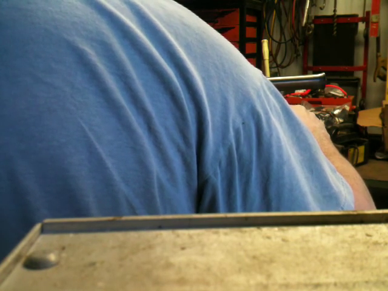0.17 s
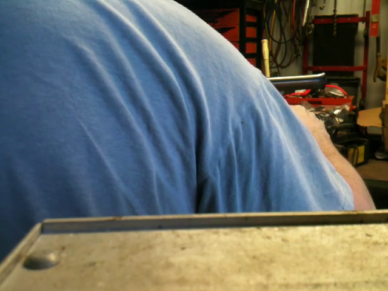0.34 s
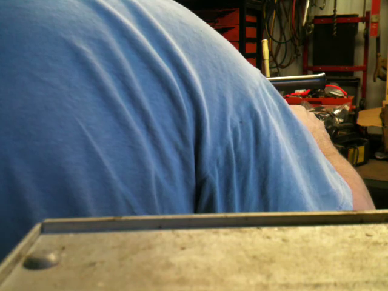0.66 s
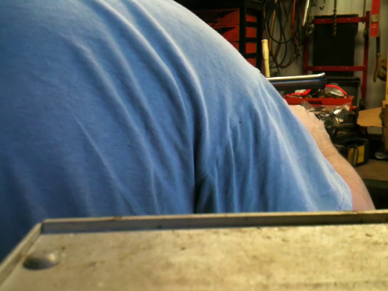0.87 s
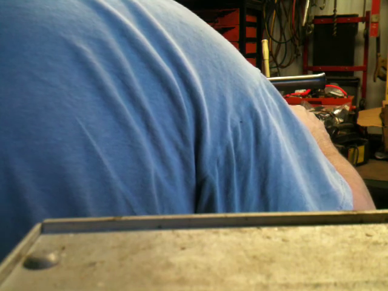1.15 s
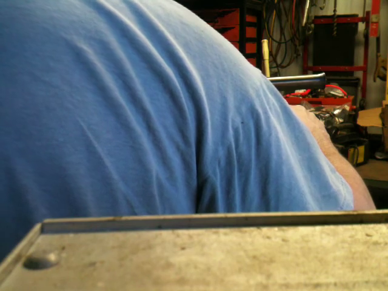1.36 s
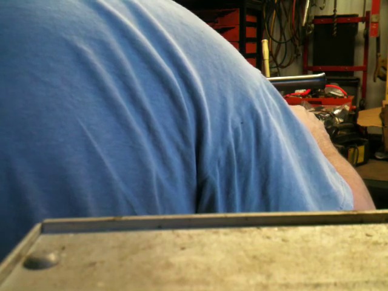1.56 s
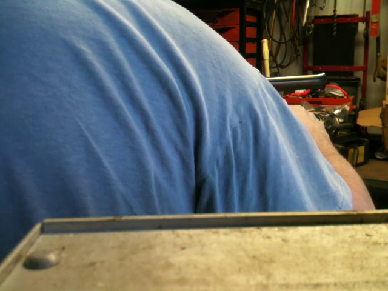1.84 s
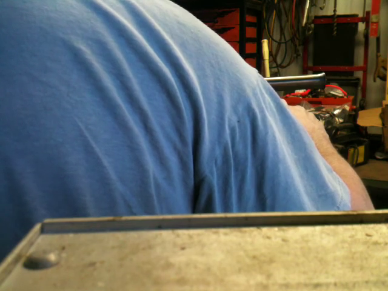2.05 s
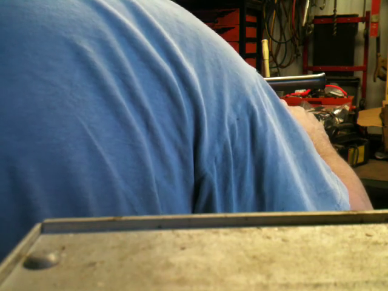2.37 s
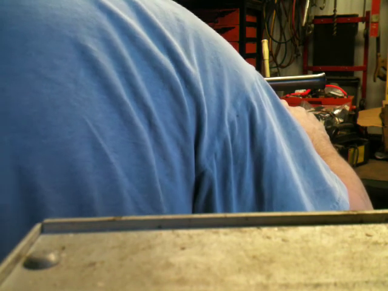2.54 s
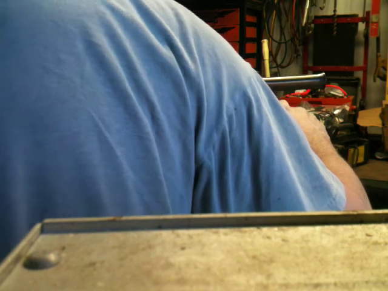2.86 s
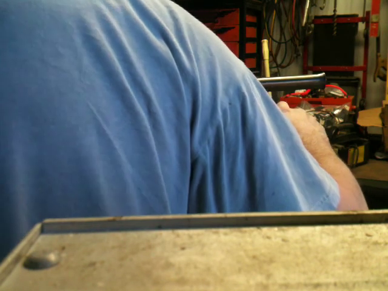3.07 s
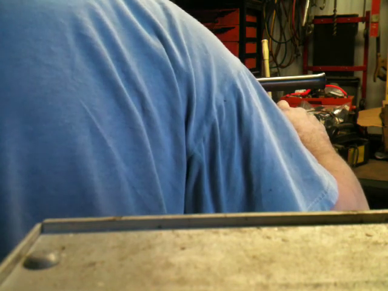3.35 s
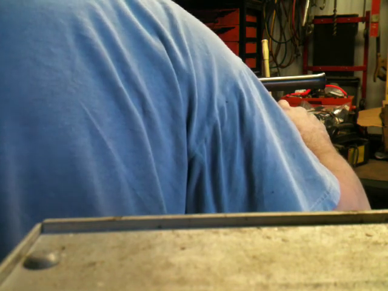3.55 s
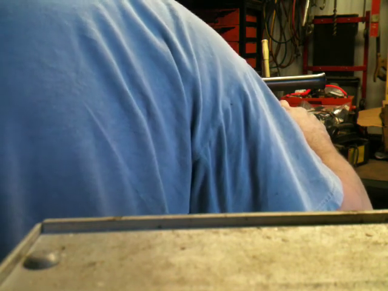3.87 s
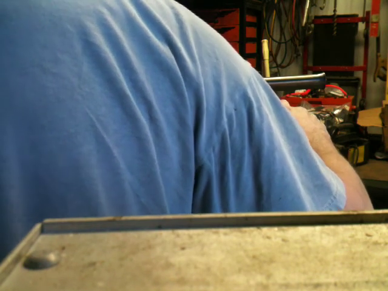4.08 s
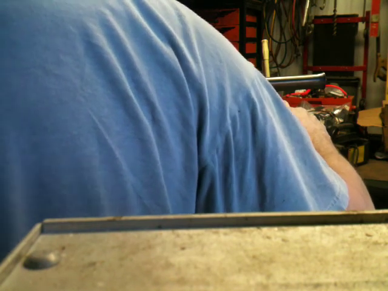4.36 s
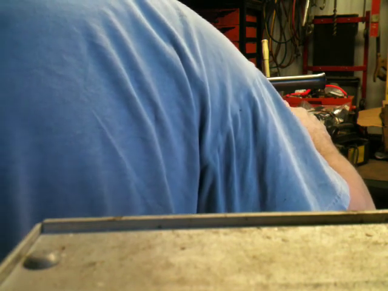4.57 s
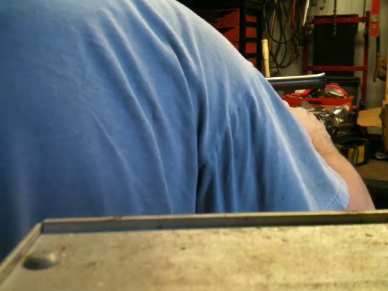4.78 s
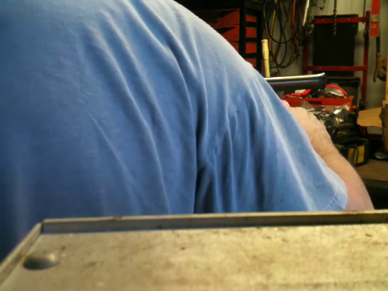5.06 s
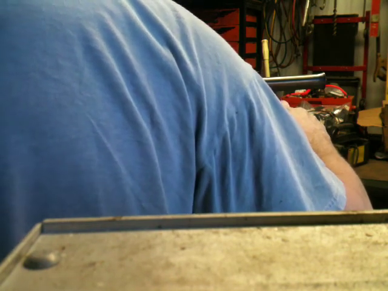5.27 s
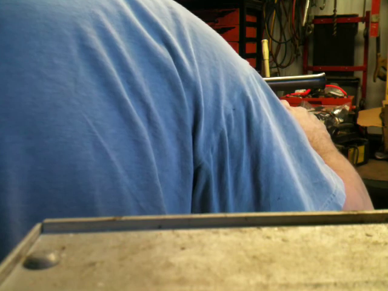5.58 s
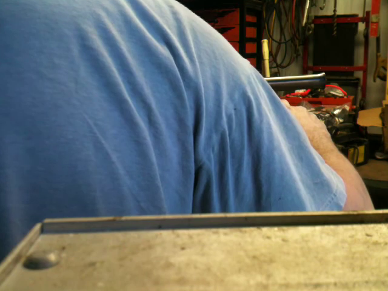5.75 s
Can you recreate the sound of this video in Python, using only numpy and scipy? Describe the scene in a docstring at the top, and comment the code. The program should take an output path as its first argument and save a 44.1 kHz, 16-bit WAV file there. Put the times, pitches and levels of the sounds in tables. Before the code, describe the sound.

A small pulse jet engine runs in a workshop with a loud, steady buzzing drone. Short spells of rough burning keep breaking through as crackle and a hollow pipe ring, and the pitch sometimes leaps for an instant. A low roar lies underneath, and two soft thuds come near the end. The microphone is close and overloaded.

```python
"""Droning pulse jet

A small pulse jet drones close to an overloaded microphone. The pressure in its pipe swings once per
firing. In short spells of rough burning the swing weakens, and crackle, overtones and pipe ringing
break through. Now and then the pitch leaps. A low roar runs underneath, two soft thuds come near
the end, and the microphone's input flattens the tops of the wave."""
import sys
import numpy as np
from scipy import signal
from scipy.fft import rfft, irfft, next_fast_len
from scipy.io import wavfile
from scipy.ndimage import map_coordinates

SR = 44100
rng = np.random.default_rng(int(sys.argv[2]) if len(sys.argv) > 2 else 0)


def bounce(signal):
    """Save signal as a 16-bit WAV file at the path given by the first command-line argument."""
    frames = np.transpose(np.atleast_2d(signal))
    limited = np.clip(frames, -1, 1)
    pcm = np.round(limited * 32767).astype(np.int16)
    wavfile.write(sys.argv[1], SR, pcm)


N = 261072

# How the jet runs; "lock" is how strongly the overtones follow the firing: (time [s], firing rate [Hz],
# lock [dB], roar level [dB], share of rival tones [0-1], roughness between spells [dB])
ENGINE_RUN = [(0.0, 260.5, -0.5, -22, 0.13, -28.5), (0.25, 258, 1.5, -27, 0.17, -18),
              (0.299, 253.8, -11, -20, 0.4, -26.5), (0.7, 251, -8, -36, 0.23, -21),
              (0.75, 261, 0.5, -33, 0.16, -22), (0.92, 262.7, 2.5, -27, 0.15, -20),
              (1.0, 259.4, -2, -24, 0.18, -21), (1.15, 264.2, 1, -36, 0.02, -19),
              (1.401, 264.9, -1.5, -26, 0.08, -18.5), (2.06, 265.1, 1, -32, 0.1, -18),
              (2.181, 272.6, 1, -38, 0.12, -18), (2.29, 255.2, -3, -31, 0.22, -21.5),
              (2.72, 251.5, -3, -20.5, 0.25, -21.5), (2.85, 254.4, -5, -27, 0.28, -21),
              (3.4, 257, -5, -37, 0.17, -21), (3.8, 254.3, -5, -27, 0.28, -22.5),
              (4.35, 253.3, -5, -28, 0.22, -22), (4.85, 250.6, -5.5, -23, 0.27, -23),
              (5.2, 253.1, -7, -23.5, 0.22, -23), (5.92, 251.2, -2, -26, 0.25, -22.5)]
# Rival tones on either side of the firing rate: (pitch [Hz], width [Hz], relative level [dB])
RIVAL_TONES = [(212, 35.4, -6.5), (308.4, 13, -2.5)]
# Tone colour of the low roar: (frequency [Hz], relative level [dB])
ROAR_COLOUR = [(15, -40), (40, 4), (90, -19.5), (190, 5.5), (330, 4), (450, -31.5)]
# Strong spells of rough burning: (time [s], strength [dB], length [ms])
ROUGH_SPELLS = [(0.026, -12, 41), (0.098, -15.5, 21.3), (0.14, -19, 25), (0.173, -14.5, 27),
                (0.27, -19, 6.8), (0.323, -12, 36), (0.419, -19, 28), (0.451, -14, 8.1), (0.479, -13, 20),
                (0.542, -16.5, 17), (0.58, -11, 11), (0.709, -15, 29), (0.745, -12, 4.6), (0.78, -13.5, 50),
                (0.845, -17, 63), (0.907, -12, 19), (0.975, -23, 30), (1.005, -10.5, 8.4), (1.038, -19, 52),
                (1.069, -15, 15), (1.107, -13.5, 37), (1.178, -16.5, 41), (1.224, -14, 67),
                (1.322, -14, 63), (1.375, -16.5, 46), (1.434, -14, 46), (1.519, -12.5, 58),
                (1.568, -20.5, 33), (1.607, -21, 9.3), (1.634, -13.5, 34), (1.682, -14, 23),
                (1.755, -16.5, 71), (1.836, -9, 34.4), (1.901, -15, 29), (1.95, -16, 41), (2.012, -13, 60),
                (2.067, -12.5, 30), (2.126, -22, 35.7), (2.203, -16.5, 55), (2.311, -23.5, 37.7),
                (2.355, -19.5, 18), (2.457, -17.5, 41), (2.487, -20, 5.5), (2.611, -24.5, 35),
                (2.69, -23, 10), (2.761, -13.5, 37), (2.794, -19, 2.9), (2.824, -23, 23),
                (2.864, -17.5, 20), (2.91, -16, 5.7), (2.976, -23, 19.5), (3.02, -24, 6.6),
                (3.051, -11.5, 8.5), (3.12, -14.5, 11), (3.147, -15, 15), (3.189, -10.5, 25),
                (3.297, -16.5, 10.5), (3.351, -21, 22.6), (3.412, -17, 9), (3.449, -18, 6.2),
                (3.495, -19, 35), (3.556, -21, 20.7), (3.59, -19, 6.34), (3.63, -13, 17.2),
                (3.674, -16, 16.5), (3.718, -23, 11), (3.786, -21, 30.4), (3.841, -18.5, 8.5),
                (3.86, -19, 4.7), (3.893, -19.5, 32), (3.953, -19, 8), (4.019, -14, 24), (4.041, -18.5, 13),
                (4.078, -13, 5.4), (4.096, -16, 36), (4.146, -17.5, 7.9), (4.178, -13.5, 17.7),
                (4.217, -17, 16), (4.252, -16.5, 32), (4.281, -20, 8.1), (4.326, -21, 27.5),
                (4.364, -23, 11.7), (4.461, -14.5, 9), (4.604, -13, 14.7), (4.694, -18, 19.6),
                (4.781, -16.5, 8), (4.805, -15, 31), (4.888, -12.5, 44), (4.934, -17, 6.4),
                (5.049, -15.5, 15.5), (5.09, -15, 47), (5.174, -18, 10.9), (5.214, -18, 4.4),
                (5.242, -19.5, 24), (5.31, -21, 9.7), (5.393, -18.5, 13.4), (5.452, -16.5, 9.5),
                (5.518, -14.5, 30), (5.676, -16.5, 18.1), (5.717, -15.5, 46), (5.848, -18.5, 22),
                (5.915, -13, 16)]
# Overtones of the firing: (multiple of the firing rate, relative level [dB])
FIRING_OVERTONES = [(2, -7), (4, -13), (5, -16.5), (6, -18.5)]
# Tone colour of the rough exhaust noise: (frequency [Hz], relative level [dB])
CRACKLE_COLOUR = [(120, -42), (300, 6), (450, -8.5), (800, -10.5), (1500, -7.5), (3000, -13), (7000, -19.5),
                  (16000, -35)]
# Upper tones at which the pipe rings: (pitch [Hz], width [Hz], relative level [dB])
PIPE_TONES = [(527, 26, 2.5), (675.3, 30, -1), (794.3, 32.6, 0.5), (1050.5, 13, -1), (1330, 45, -6.5),
              (1610, 10, -39), (1925, 57, -14)]
# Stumbles, where the upper rival tone takes the lead: (time [s], leap in rate [Hz], length [ms])
RATE_LEAPS = [(0.316, 43.9, 43.4), (0.418, 47.1, 24.86), (0.47, 19.06, 48.7), (0.535, 34.9, 35.6),
              (0.577, 20.7, 20.25), (0.7, 44.8, 21.9), (2.46, 35.7, 22.4), (2.76, 36.1, 14.3),
              (3.182, 45.12, 25.03), (4.795, 42.9, 35), (4.895, 26, 32.8), (5.111, 28.7, 34.8),
              (5.71, 48, 30)]
# Low thuds: (time [s], level before a 13 dB boost [dB])
LOW_THUDS = [(4.629, -16), (5.609, -8)]

SAG_HZ, SAG_MS = 6, 50  # the dip in firing rate before each leap
SPUTTER_DB, LOCK_WAVER_DB, ROAR_WAVER_DB = 1, 3, 6  # typical size of the random wavering
UNLOCK_DB_PER_HZ = 0.18  # the overtones lose their lock as the rate leaps
TOP_HZ = 15850


def amp(db):
    """Turn decibels into a gain."""
    return 10 ** (np.asarray(db) / 20)


def unit(x):
    """Scale a signal to an average size (rms) of 1."""
    return x / np.sqrt(np.mean(x ** 2))


def wobble(rate):
    """A smooth curve through `rate` random points a second."""
    return map_coordinates(rng.standard_normal(int(N * rate / SR) + 4), [np.arange(N) * rate / SR])


def bumps(t, rows, edge):
    """One flat-topped bump per (time [s], height, length [ms]) row; a higher edge is steeper."""
    coarse = t[::32]
    curve = sum(height * np.exp(-np.abs((coarse - s) * 2000 / ms) ** edge) for s, height, ms in rows)
    return np.interp(t, coarse, curve)


def filtered(x, response):
    """Scale each frequency in x by response(hz)."""
    size = next_fast_len(N + 8192)
    return irfft(rfft(x, size) * response(np.fft.rfftfreq(size, 1 / SR)), size)[..., :N]


def coloured(x, colour):
    """Give x a tone colour from (frequency [Hz], level [dB]) points, at rms 1."""
    freqs, db = np.transpose(colour)
    return unit(filtered(x, lambda hz: amp(np.interp(np.log(hz + 1), np.log(freqs), db))))


def ringing(tones):
    """Noise ringing at (pitch [Hz], width [Hz], level [dB]) tones, at rms 1."""
    def response(hz):
        return sum((-1) ** k * amp(db) * 1j * hz * width / (pitch ** 2 - hz ** 2 + 1j * hz * width)
                   for k, (pitch, width, db) in enumerate(tones))
    return unit(filtered(rng.standard_normal(N), response))


def firing_rate(t, hz):
    """The firing rate jitters, sags just before each stumble and leaps during it."""
    sags = [(s - (ms + SAG_MS) / 2000, SAG_HZ, SAG_MS) for s, _, ms in RATE_LEAPS]
    rate = hz + bumps(t, RATE_LEAPS, edge=2.98) - bumps(t, sags, edge=2.93)
    return rate * (1 + 0.00786 * wobble(70))


def pressure_swing(cycles):
    """The drone: each half cycle the pressure creeps towards a shelf, kicks over it, then reverses."""
    half, progress = np.divmod(2 * cycles, 1)
    creep = .6 - 1.32 * np.exp(-(np.maximum(progress, 1e-9) / .33) ** 1.6)
    kick = .17 / (1 + np.exp(-(progress - .72 - .04 * wobble(300)) / .012))
    return (creep + kick) * (-1) ** half


def low_roar(level_db):
    """Deep noise under the drone, wavering in loudness."""
    return amp(level_db + ROAR_WAVER_DB * wobble(15)) * coloured(rng.standard_normal(N), ROAR_COLOUR)


def rough_burning(t, calm_db, beat):
    """How rough the burning is: small sputters on the weak beats, plus the strong spells."""
    weakness = 1 / np.clip(np.abs(beat), .68, 2)
    sputters = amp(calm_db + SPUTTER_DB * wobble(45)) * weakness ** 2.3
    spells = bumps(t, [(s, amp(db), ms) for s, db, ms in ROUGH_SPELLS], edge=4.2)
    return sputters + spells * weakness ** 0.1


def overtones(phase, drive, lock_db):
    """Rough burning brings out overtones of the firing; each higher one lags a little more."""
    tones = sum(amp(db + wobble(40)) * np.cos(k * phase + 2.77 - 0.59 * k) for k, db in FIRING_OVERTONES)
    held = 0.01 * amp(lock_db)  # a little sounds on between the spells
    return (drive + held) * amp(lock_db + 2) * tones


def crackle(phase, rough, drive, lock_db):
    """Exhaust noise peaks just after each kick, in spits that merge as the burning roughens."""
    kicks_db = 1.34 * np.cos(2 * phase - 1.6)
    upward_db = 3 * amp(lock_db) * np.cos(phase - 1.3)  # more lock favours the upward kick
    spits_db = 11.6 / (1 + rough / 0.059) * wobble(900)
    noise = amp(kicks_db + upward_db + spits_db) * rng.standard_normal(N)
    return drive * amp(-4 - 0.082 * lock_db) * coloured(noise, CRACKLE_COLOUR)


def pipe_ring(drive, lock_db):
    """Rough burning rings the pipe; a hum near its third tone sings on between the spells."""
    ring = amp(-7.0 - 0.36 * lock_db) * drive * ringing(PIPE_TONES)
    hum = amp(-24) * ringing([(820, 12, 0)])
    return ring + hum


def jet():
    """The firing makes a drone, which gives way to harsher sounds when the burning is rough."""
    t = np.arange(N) / SR
    times, *columns = np.transpose(ENGINE_RUN)
    hz, lock_db, roar_db, rival_share, calm_db = (np.interp(t, times, column) for column in columns)
    lock_db += LOCK_WAVER_DB * wobble(14) - UNLOCK_DB_PER_HZ * bumps(t, RATE_LEAPS, edge=3.9)
    cycles = np.cumsum(firing_rate(t, hz)) / SR
    # the rival tones beat with the firing and pull its timing to and fro
    beat = 1 + rival_share * signal.hilbert(ringing(RIVAL_TONES)) * np.exp(-2j * np.pi * cycles)
    pull = np.angle(beat) / (2 * np.pi)
    phase = 2 * np.pi * (cycles + 0.57 * pull - .34)
    rough = rough_burning(t, calm_db, beat)
    drone = pressure_swing(cycles + pull) * np.abs(beat) ** 0.19 / (1 + (rough / 0.32) ** 2.8)
    drive = rough * (1 + (rough / 2.04) ** 0.13)  # how hard the roughness pushes the harsher sounds
    return (drone + low_roar(roar_db) + overtones(phase, drive, lock_db)
            + crackle(phase, rough, drive, lock_db) + pipe_ring(drive, lock_db))


def thuds():
    """Each thud is one soft, low push."""
    out, t = np.zeros(N), np.arange(SR // 10) / SR
    push = (1 - t / 0.0036) * np.exp(-t / 0.0029)
    for s, db in LOW_THUDS:
        out[round(s * SR):][:len(t)] += amp(db + 13.0) * push
    return out


def scene():
    """The jet and two low thuds, in one channel."""
    return (jet() + thuds())[None]


def record(dry):
    """The overloaded input clips and hisses, thins the bass, clips again and cuts the highest treble."""
    def clip(x, top, hardness):
        return x / (1 + np.abs(x / top) ** hardness) ** (1 / hardness)
    hiss = amp(-35.0) * rng.standard_normal(dry.shape)
    first_stage = clip(dry, top=0.71, hardness=33) + hiss
    thinned = filtered(first_stage, lambda hz: 1j * hz / (1j * hz + 70))  # fades below 70 Hz
    second_stage = clip(thinned, top=0.66, hardness=22) - .006
    return filtered(second_stage, lambda hz: hz < TOP_HZ)


dry = scene()
out = record(dry)
bounce(out)
```